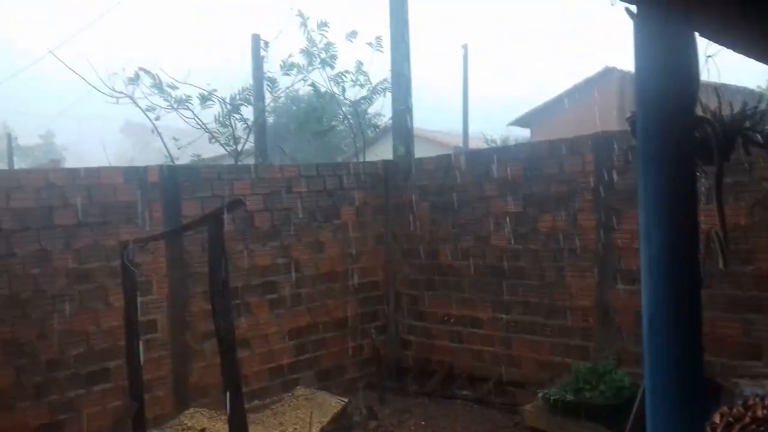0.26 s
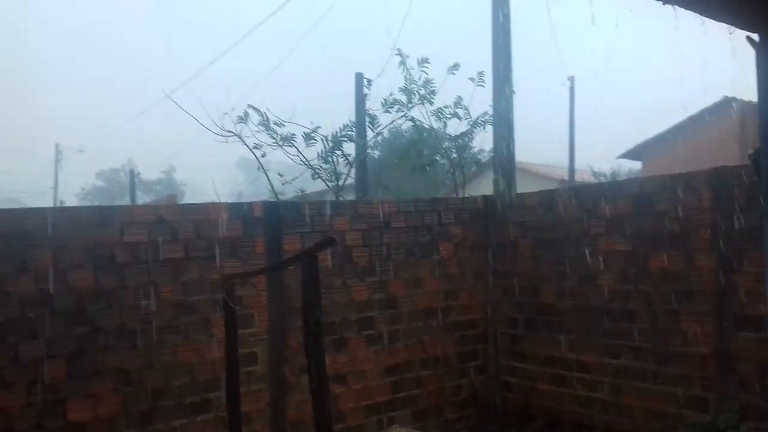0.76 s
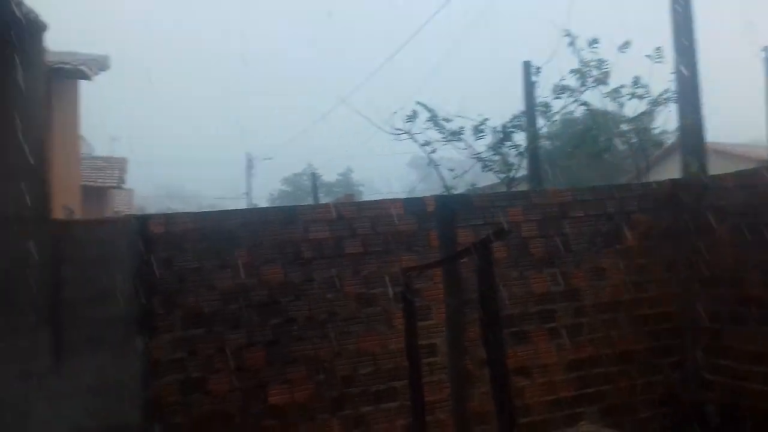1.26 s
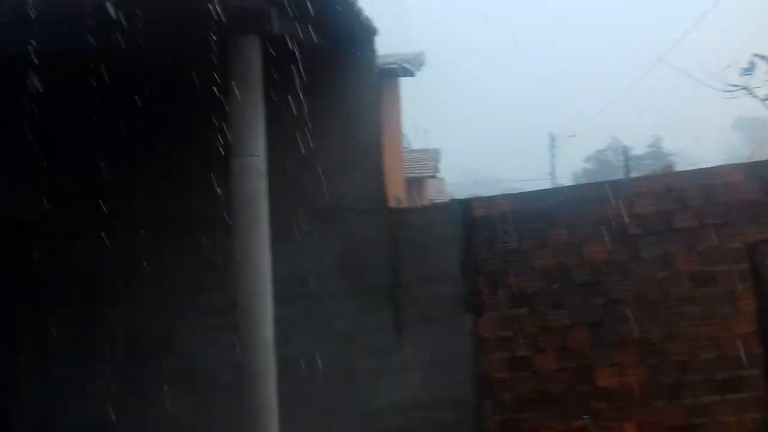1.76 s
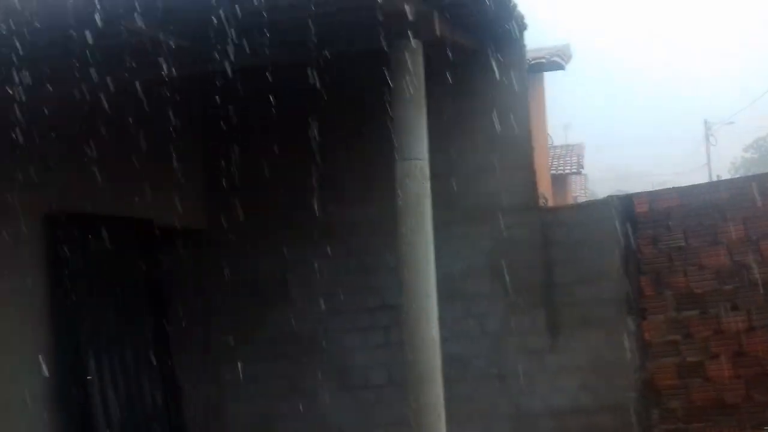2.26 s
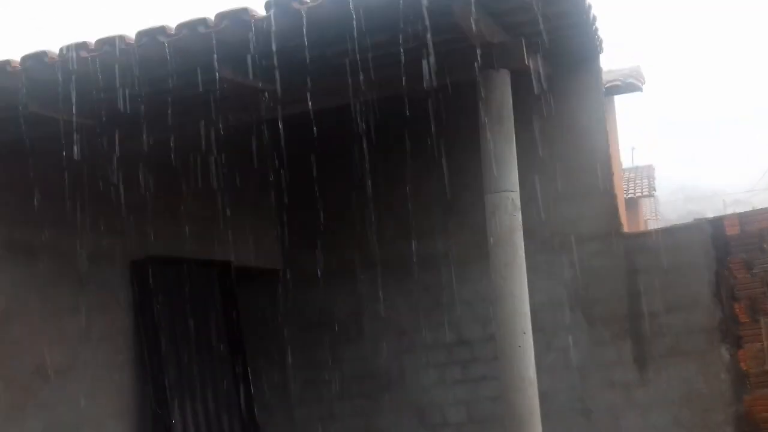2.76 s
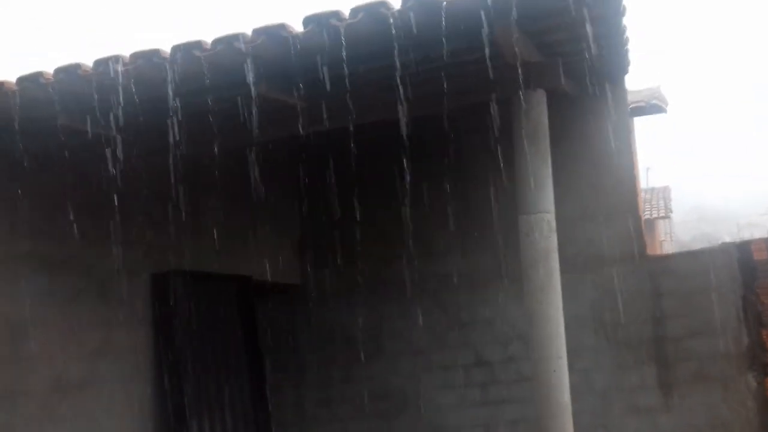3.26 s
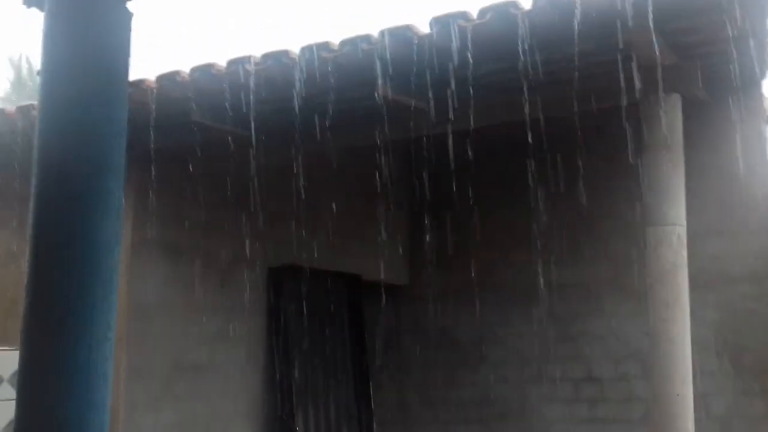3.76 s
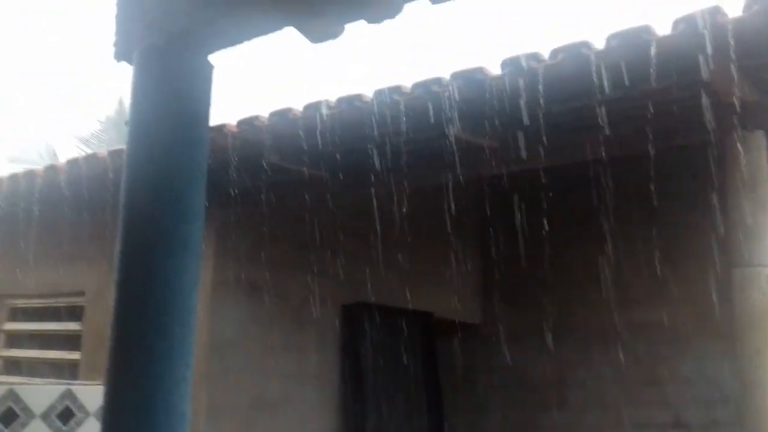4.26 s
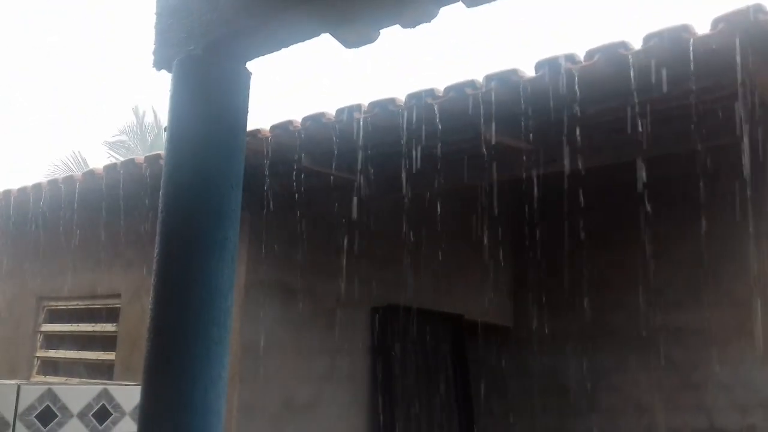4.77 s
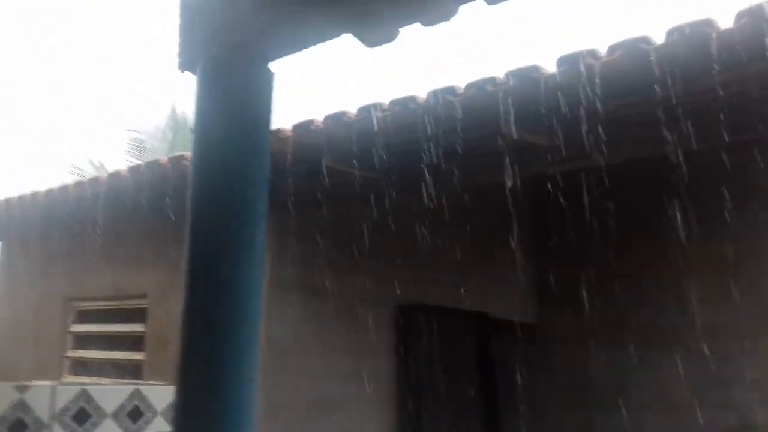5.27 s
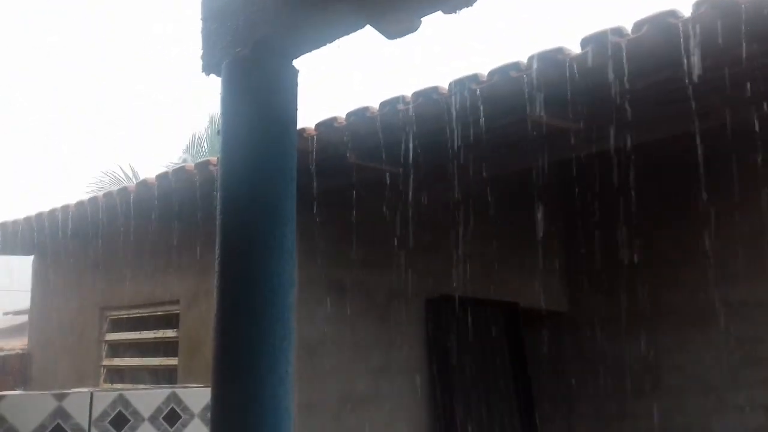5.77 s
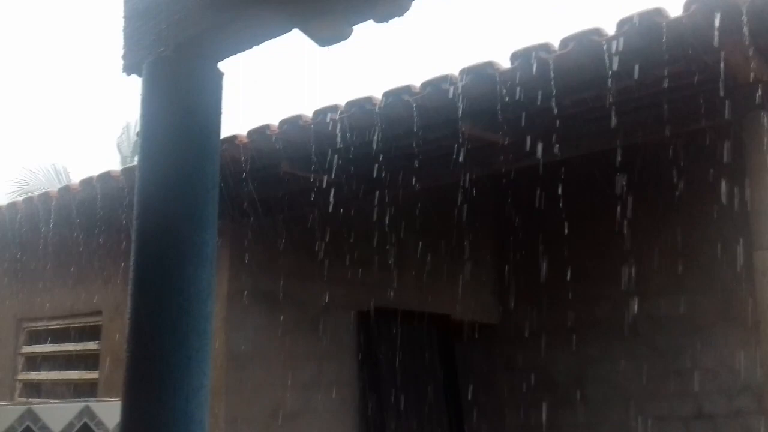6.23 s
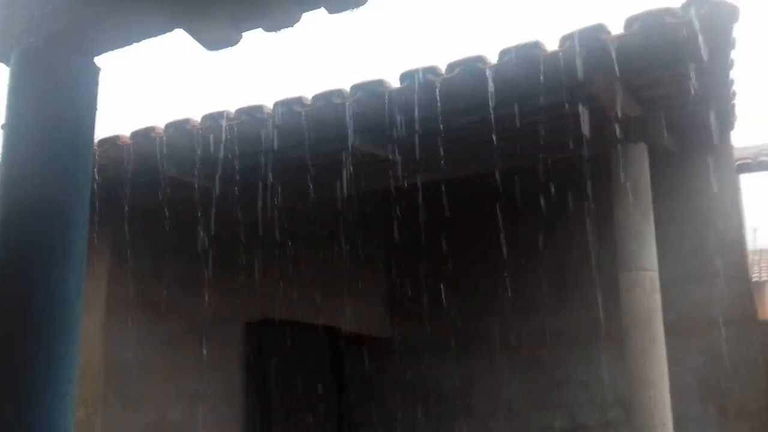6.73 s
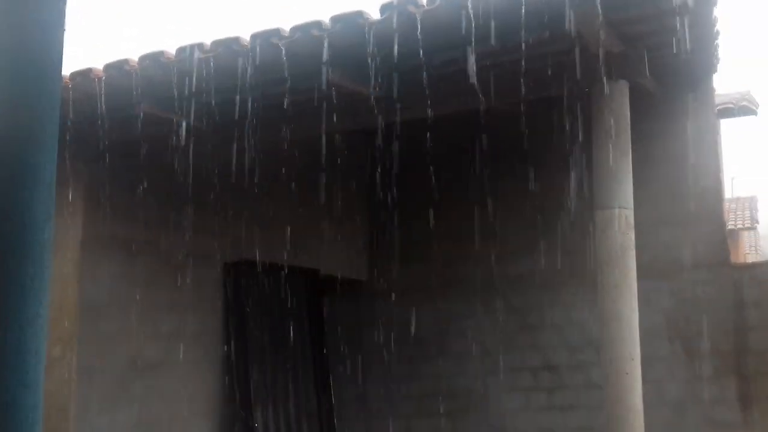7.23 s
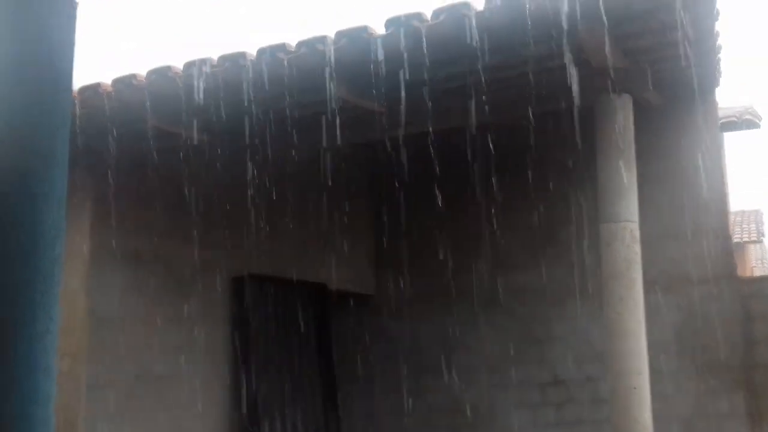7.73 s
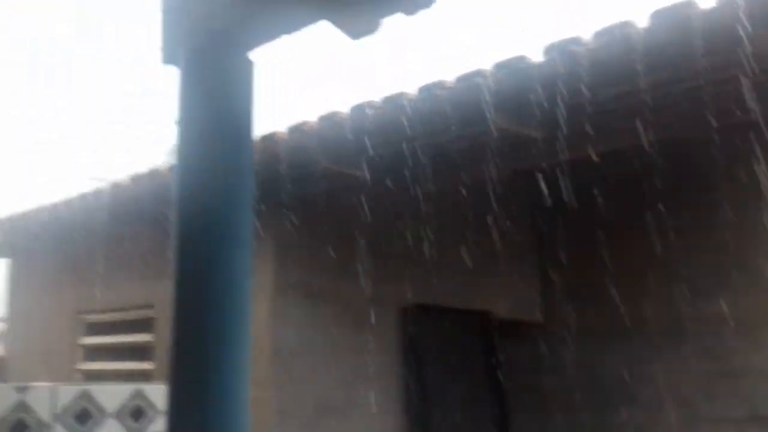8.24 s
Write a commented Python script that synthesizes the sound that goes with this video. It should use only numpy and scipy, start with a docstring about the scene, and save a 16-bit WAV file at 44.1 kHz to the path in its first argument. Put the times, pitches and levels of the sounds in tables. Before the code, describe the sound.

Heavy rain falls throughout, a soft wash on distant tile roofs under the closer, brighter splatter of water pouring from the eaves. Big drops plop into puddles and lumps of water slap the wet ground. Soft low bumps touch the hand-held microphone in the first half, and a faint engine-like drone rises far away near the end. The walled backyard is heard in mono from a porch.

```python
"""First comes heavy rain: a soft wash from far tile roofs, and runoff from the eaves splattering
on the ground and throwing fine spray. Soft low bumps reach the microphone, drops plop into puddles
and gouts of water slap down. Late on, something drones far away, like an engine. The walled backyard
is heard from a porch through a hand-held mono microphone whose opening rings in the treble."""
import sys
import numpy as np
from scipy import signal
from scipy.fft import rfft, irfft
from scipy.io import wavfile

SR = 44100
rng = np.random.default_rng(int(sys.argv[2]) if len(sys.argv) > 2 else 0)


def master(y):
    """Save y as 16-bit WAV."""
    cut = np.clip(np.atleast_2d(y).T, -1, 1)
    pcm = np.round(cut * 32767)  # scale
    wavfile.write(sys.argv[1], SR, pcm.astype(np.int16))


N = 374850  # 8.5 seconds
T = np.arange(N) / SR


def gain_of(db):
    """Turns decibels into a number to multiply by."""
    return 10 ** (np.asarray(db) / 20)


def evened(x):
    """Scales a sound to an average strength (rms) of 1."""
    return x / np.sqrt(np.mean(x ** 2) + 1e-20)


def level(curve):
    """Joins rows of seconds and dB into a gain for every sample."""
    return gain_of(np.interp(T, *np.transpose(curve)))


def add(mix, start_s, sound):
    """Mixes a sound in at its start time."""
    part = mix[max(round(start_s * SR), 0):][:len(sound)]
    part += sound[:len(part)]


def coloured(x, colour):
    """Shapes a sound's bass and treble by rows of Hz and dB, then evens its strength."""
    hz, db = np.transpose(colour)
    shape_db = np.interp(np.log(np.fft.rfftfreq(N, 1 / SR) + 1), np.log(hz), db)
    return evened(irfft(rfft(x) * gain_of(shape_db), N))


def wander(rate_hz):
    """A random curve that wobbles up to about rate_hz times a second."""
    hz = np.fft.rfftfreq(N, 1 / SR)
    return evened(irfft(rfft(rng.standard_normal(N)) * (hz > 2) / (1 + (hz / rate_hz) ** 2), N))


def impacts(per_s, spread_db):
    """Clicks at random moments: most are small, a few large."""
    size = gain_of(spread_db * np.minimum(rng.exponential(1, N), 4))
    return size * rng.choice([-1, 1], N) * (rng.random(N) < per_s / SR)


def ring(x, hz, width_hz):
    """Lets a sound ring around one pitch."""
    hz = min(hz, SR / 3)
    sharpness = hz / min(width_hz, SR / 3)
    return signal.lfilter(*signal.iirpeak(hz, sharpness, fs=SR), x)


def drops(low_hz, high_hz, per_s, spread_db, cycles, sizes):
    """Drops of many sizes, each a few dying cycles at its own pitch."""
    t, out = np.arange(1024) / SR, np.zeros(N)
    for hz in np.geomspace(low_hz, high_hz, sizes):
        tick = np.sin(2 * np.pi * hz * t) * np.exp(-hz * t / cycles)
        out += signal.oaconvolve(impacts(per_s / sizes, spread_db), tick * hz)[:N]
    return evened(out)


def diffused(x, decay_s, echo_db):
    """Each drop lands at its own spot, so the wall echoes blur into noise that follows the patter."""
    keep = np.exp(-1 / (decay_s * SR))
    lingering_power = signal.lfilter([1 - keep], [1, -keep], x ** 2)
    echoes = np.sqrt(lingering_power) * rng.standard_normal(N)
    return x + gain_of(echo_db) * echoes


# How loud the rain on the far roofs is. Each row: time in seconds, relative level in dB.
ROOF_LEVELS = [(0, -34), (0.95, -33.5), (1.35, -34), (1.8, -33), (3.0, -31.5), (4.6, -33), (5.5, -31.5),
               (7.1, -33), (8.5, -31)]
# Its tone. Each row: frequency in Hz, relative level in dB.
ROOF_TONE = [(20, -42), (55, -19.5), (100, -11), (190, -6.5), (320, -7), (500, -4), (800, -1.5),
             (1100, 1.5), (2000, -0.5), (3200, -8.5), (6000, -14.5), (16000, -45)]

def roof_rain(gust_db=0.7):
    """Countless far drops merge into a wash; nearer ones patter on tiles. Both come in uneven sheets."""
    wash = coloured(rng.standard_normal(N), ROOF_TONE)
    patter = coloured(drops(356, 2980, per_s=700, spread_db=3.5, cycles=2.55, sizes=24), ROOF_TONE)
    sheets = gain_of(gust_db * wander(rate_hz=6))
    return gain_of(1) * level(ROOF_LEVELS) * sheets * evened(wash + gain_of(-6.5) * patter)


# Surges of water spilling over the eaves. Each row: time of the peak in seconds, rise in dB.
RUNOFF_SURGES = [(0.04, 4.5), (0.382, 1.3), (0.865, 1), (1.04, 2.5), (2.366, 2.5), (3.048, 0.8),
                 (3.259, 1.5), (3.535, 2), (4.34, 1.4), (4.565, 1), (4.81, 2), (5.115, 2), (5.736, 3.5),
                 (6.272, 2.5), (6.99, 3), (7.169, 1.5), (7.654, 1.3), (8.016, 1.5), (8.138, 0.3),
                 (8.3, 1.5)]

def surge_db(swell_s=0.047):
    """How far the runoff rises above its steady flow: every surge swells and ebbs in the same way."""
    return sum(db * np.exp(-((T - peak_s) / swell_s) ** 2) for peak_s, db in RUNOFF_SURGES)


# Water pouring off the eaves. Each row: time in seconds, relative level in dB.
RUNOFF_LEVELS = [(0, -24), (2.0, -23), (3.0, -23), (4.2, -23.1), (5.3, -22), (6.1, -22.5), (6.55, -23),
                 (7.9, -22), (8.5, -23)]
# The tone of its splatter. Each row: frequency in Hz, relative level in dB.
SPLATTER_TONE = [(100, -48), (500, -1.5), (1200, -13), (2200, 0.5), (3100, 0), (4000, 2.5), (4900, 0.5),
                 (6000, -1.5), (8000, -7.5), (10500, -9.5), (13000, -6.5), (17000, -13)]

def runoff():
    """The streams break into gouts, so they splatter in clumps of tiny hits, with bursting bubbles."""
    clumps = gain_of(1.2 * wander(rate_hz=17))
    hits = diffused(impacts(per_s=9000, spread_db=3) * clumps, decay_s=0.074, echo_db=-3.5)
    bubbles = drops(937, 5270, per_s=1500, spread_db=2.5, cycles=2.8, sizes=30)
    splatter = coloured(hits, SPLATTER_TONE) + gain_of(-7.5) * coloured(bubbles, SPLATTER_TONE)
    return gain_of(-9.5 + surge_db()) * level(RUNOFF_LEVELS) * splatter


def droplets(tone, per_s, spread_db):
    """Tiny droplets land in flurries and make a fizz."""
    flurries = gain_of(1.1 * wander(rate_hz=19))
    hits = impacts(per_s, spread_db) * flurries
    return coloured(diffused(hits, decay_s=0.02, echo_db=-2), tone)


# Spray off the wet ground, and the finer mist. Each row: time in seconds, relative level in dB.
SPRAY_LEVELS = [(0, -45.5), (0.55, -44), (1.1, -41.5), (2.3, -41), (3.55, -41.5), (3.9, -43.5),
                (5.6, -43.5), (7.0, -44.5), (8.5, -44.5)]
MIST_LEVELS = [(0, -54), (0.6, -54.5), (1.7, -54), (2.8, -48), (3.6, -49), (4.3, -50.5), (7.2, -53),
               (8.5, -50.5)]
# Their tones. Each row: frequency in Hz, relative level in dB.
SPRAY_TONE = [(2000, -56), (5500, -11), (7500, -1.5), (10300, 1), (12000, 0.5), (16000, -11.5)]
MIST_TONE = [(6000, -24), (10000, -14.5), (12000, -5.5), (15500, 0.5), (18000, -14)]

def spray(surge_share=0.28):
    """The splatter throws up spray, more with each surge; the smaller the droplet, the higher its tick."""
    coarse = gain_of(10) * level(SPRAY_LEVELS) * droplets(SPRAY_TONE, per_s=5500, spread_db=2)
    mist = gain_of(20) * level(MIST_LEVELS) * droplets(MIST_TONE, per_s=6500, spread_db=5.5)
    return gain_of(surge_share * surge_db()) * (coarse + mist)


# Bumps on the microphone. Each row: time of the peak in seconds, relative level in dB, length in seconds.
MIC_BUMPS = [(0.067, -45, 0.048), (0.423, -36, 0.014), (0.52, -40, 0.042), (.882, -42, 0.023),
             (0.922, -34.5, 0.025), (0.968, -42, 0.033), (1.019, -41, .023), (1.457, -39, 0.03),
             (1.513, -35, 0.029), (1.574, -37, 0.053), (1.67, -39, 0.036), (1.74, -41, 0.054),
             (1.86, -43, .025), (1.95, -42, 0.038), (2.138, -40, 0.045), (2.49, -45, .04),
             (2.558, -37.5, 0.036), (2.74, -43, 0.05), (2.91, -34, 0.028), (3, -31.5, 0.015),
             (3.066, -36, 0.019), (3.248, -43, 0.018), (4.143, -42, 0.044), (4.243, -42, 0.031)]
# Their dull tone. Each row: frequency in Hz, relative level in dB.
BUMP_TONE = [(15, -32), (40, -10), (70, -3.5), (130, 0.5), (200, -7.5), (300, -11.5), (600, -60),
             (2000, -75)]

def bumps(lowest_cycles=1.3):
    """Short dull puffs of pressure at the microphone; the briefer the puff, the less bass it holds."""
    out, t = np.zeros(N), np.arange(-SR // 10, SR // 10) / SR
    rumble = coloured(rng.standard_normal(N), BUMP_TONE)
    for peak_s, db, length_s in MIC_BUMPS:
        swell = np.exp(-3 * (t / length_s) ** 2)
        bass_cut = signal.butter(2, lowest_cycles / length_s, "high", fs=SR, output="sos")
        puff = signal.sosfiltfilt(bass_cut, swell * rumble[round(peak_s * SR):][:len(t)])
        puff *= np.linalg.norm(swell) / np.linalg.norm(puff)  # as much energy as the swell
        out += gain_of(db + 1) * np.interp(T, peak_s + t, puff, left=0, right=0)
    return out


# Big drops falling into puddles. Each row: start in seconds, relative level in dB, middle pitch in Hz.
PUDDLE_DROPS = [(0.879, -22.5, 1080), (.929, -25, 2200), (.944, -24, 2150), (.967, -26, 2140),
                (1.708, -24.5, 1120), (1.902, -22, 1080), (2.026, -28, 1210), (2.253, -23.5, 1110),
                (2.405, -19.5, 1430), (2.599, -25.5, 1070), (3.554, -24, 2470), (3.597, -31, 462),
                (4.158, -20.5, 2050), (4.577, -27, 875), (4.908, -21.5, 1910), (4.989, -25, 1860),
                (6.218, -27, 820), (6.269, -23, 1260), (6.466, -30, 513), (7.110, -24.5, 1920),
                (7.265, -23, 2330)]

def plops(cycles=3.3, pitch_rise=0.12, slosh_db=-6.5, slosh_s=0.012):
    """A drop opens a pocket of air that rings briefly and rises in pitch; the water sloshes back in."""
    out, t = np.zeros(N), np.arange(SR // 16) / SR
    for start_s, db, hz in PUDDLE_DROPS:
        age = hz * t / cycles
        pitch_hz = hz * (1 + pitch_rise * (np.tanh(age) - 0.5))
        note = np.sin(2 * np.pi * np.cumsum(pitch_hz) / SR) * np.exp(-age)
        slosh = evened(ring(rng.standard_normal(len(t)), hz, 0.24 * hz)) * np.exp(-t / slosh_s)
        fade_in = 1 - np.exp(-hz * t)
        add(out, start_s, gain_of(db + 4) * (note + gain_of(slosh_db) * slosh) * fade_in)
    return out


def yard_echoes(x, fade_s=0.15, echo_db=-8):
    """Brick walls and the porch roof send back a short scatter of echoes."""
    t = np.arange(SR // 3) / SR
    echoes = rng.choice([-1, 1], len(t)) * (rng.random(len(t)) < 2000 / SR)  # about 2000 a second
    tail = echoes * (t > 0.012) * gain_of(-60 * t / fade_s)
    return x + gain_of(echo_db) * signal.oaconvolve(x, tail / np.linalg.norm(tail))[:N]


# Heavy gouts hitting wet ground. Each row: start in seconds, relative level in dB, middle pitch in Hz.
GROUND_SLAPS = [(1.005, -18, 6950), (1.170, -23, 7500), (1.516, -16, 9000), (2.148, -11, 12000),
                (2.821, -14, 12000), (3.508, -19, 13000), (3.528, -16, 11000), (3.669, -14, 10000),
                (4.582, -17, 1500), (5.549, -17, 2000), (5.761, -18, 1900), (5.970, -17, 2400),
                (6.191, -18.5, 4500), (6.285, -18, 1900), (6.771, -17, 1380), (7.387, -15.5, 1300),
                (7.650, -22, 3600), (7.6973, -12.5, 2600), (7.865, -17, 7000), (7.918, -21, 7500),
                (8.015, -19, 4500), (8.133, -22, 4400)]

def slaps(crack_s=0.0016, scatter_s=0.013, scatter_db=-15):
    """A gout, a big lump of water, cracks on the ground; then its droplets scatter."""
    out, t = np.zeros(N), np.arange(SR // 10) / SR
    fade = np.exp(-t / crack_s) + gain_of(scatter_db) * np.exp(-t / scatter_s)
    for start_s, db, hz in GROUND_SLAPS:
        burst = fade * rng.standard_normal(len(t))
        slap = ring(ring(burst, hz, width_hz=hz), hz, width_hz=hz)
        slap *= np.linalg.norm(fade) / np.linalg.norm(slap)  # same energy at any pitch
        add(out, start_s, gain_of(db - 5) * slap)
    return out


# The far drone, very faint until near the end. Each row: time in seconds, relative level in dB.
DRONE_LEVELS = [(0, -61), (5.5, -61.5), (7.18, -56), (7.28, -50), (7.9, -42.5), (8.15, -45), (8.5, -49.5)]
# Its humming notes, and the tone of its rumble. Each row: frequency in Hz, relative level in dB.
DRONE_NOTES = [(100, -5.5), (162, -9.5), (183, -3.5), (219, -6)]
RUMBLE_TONE = [(30, -35), (65, -9), (95, -0.5), (135, 7), (190, -4), (260, 9), (420, -3), (1200, -50)]

def drone(width_hz=5, rumble_db=-3):
    """A distant rumble with a few wavering notes, like an engine."""
    hum = np.zeros(N)
    for hz, db in DRONE_NOTES:
        note = ring(ring(rng.standard_normal(N), hz, width_hz), hz, width_hz)
        hum += gain_of(db) * evened(note)
    rumble = coloured(rng.standard_normal(N), RUMBLE_TONE)
    return level(DRONE_LEVELS) * (hum + gain_of(rumble_db) * rumble)


def scene():
    """All the water in the yard, the drone and the bumps, alike in both channels."""
    near_water = yard_echoes(plops() + slaps())
    mono = roof_rain() + runoff() + spray() + near_water + drone() + bumps()
    return np.array([mono, mono])


def record(dry):
    """The microphone's opening is a hollow that rings and dulls what lies above; the very top is cut."""
    ring_hz, width_hz, top_hz = 4590, 753, 15750
    hz = np.fft.rfftfreq(2 * N, 1 / SR)
    opening = ring_hz ** 2 / (ring_hz ** 2 - hz ** 2 + 1j * hz * width_hz)
    heard = irfft(rfft(dry, 2 * N) * opening)[:, :N]
    top_cut = signal.firwin(511, top_hz, window=("kaiser", 9), fs=SR)
    return signal.oaconvolve(heard, top_cut[None], "same")


dry = scene()
out = record(dry)
master(out)
```